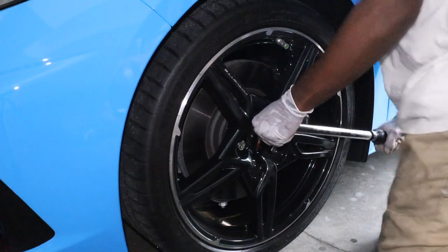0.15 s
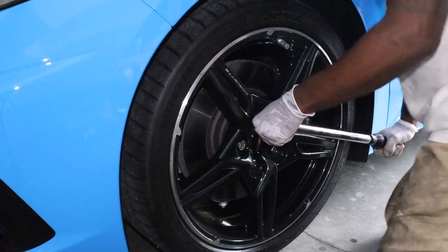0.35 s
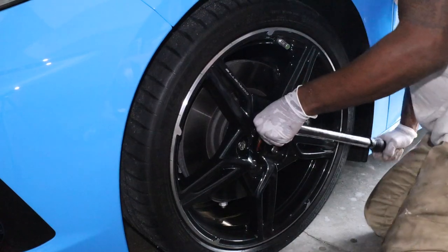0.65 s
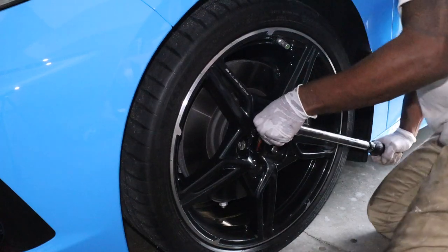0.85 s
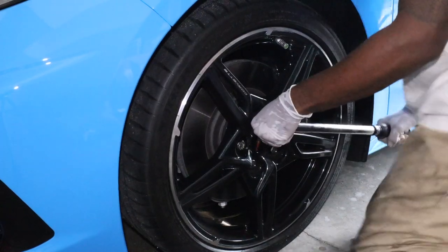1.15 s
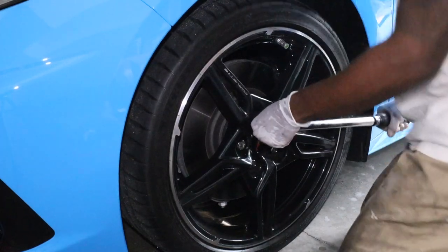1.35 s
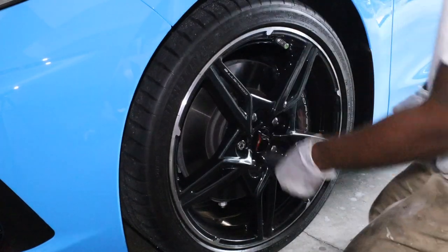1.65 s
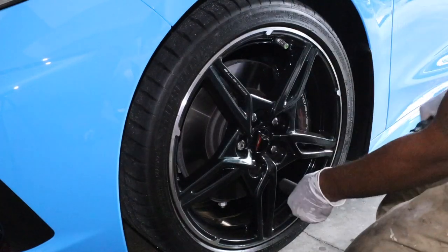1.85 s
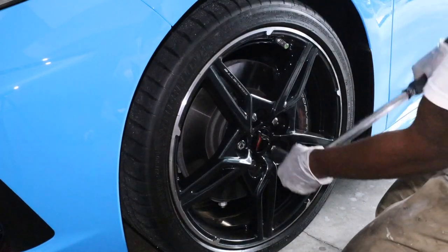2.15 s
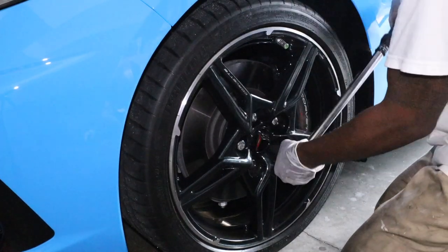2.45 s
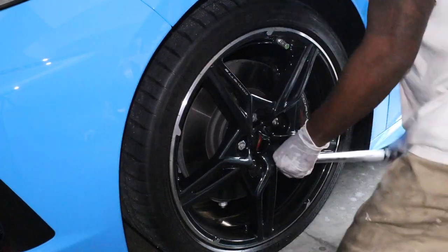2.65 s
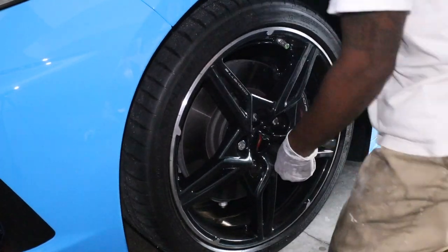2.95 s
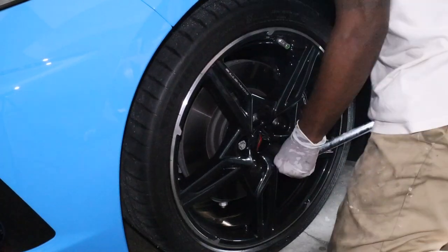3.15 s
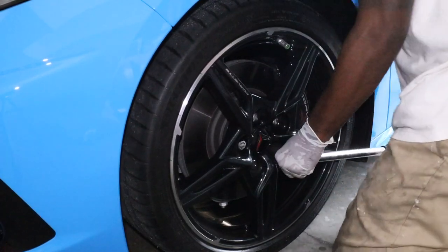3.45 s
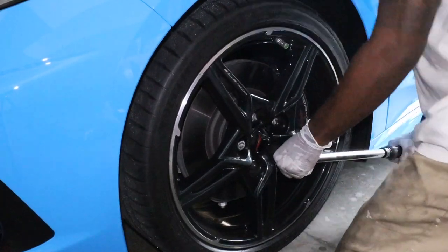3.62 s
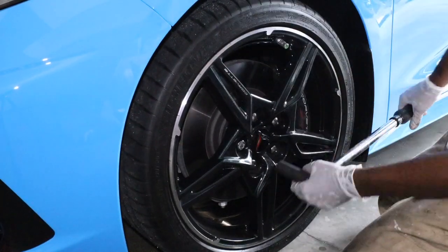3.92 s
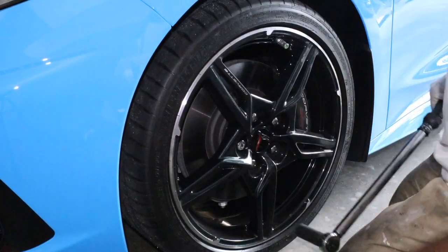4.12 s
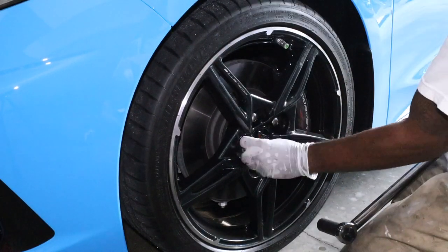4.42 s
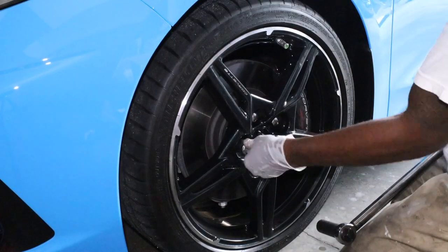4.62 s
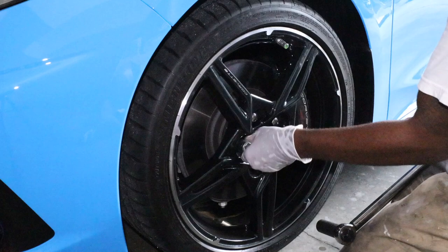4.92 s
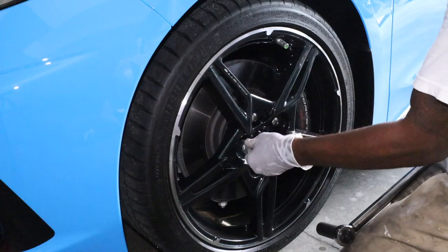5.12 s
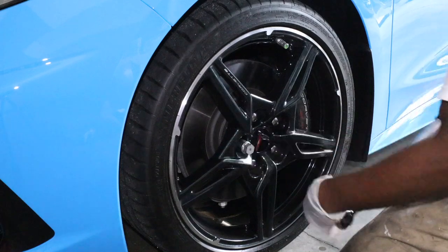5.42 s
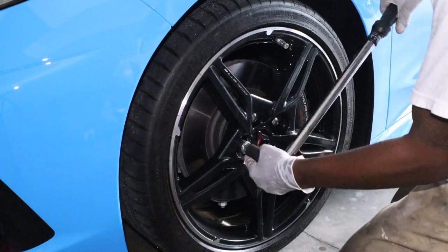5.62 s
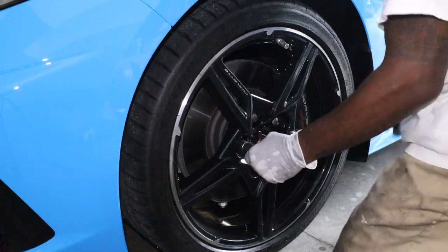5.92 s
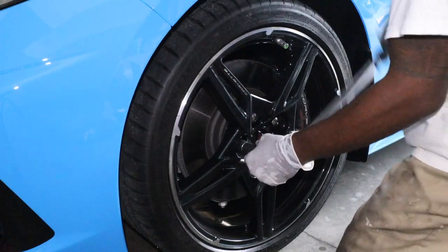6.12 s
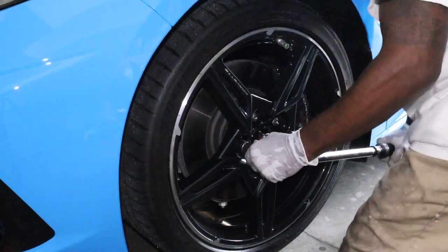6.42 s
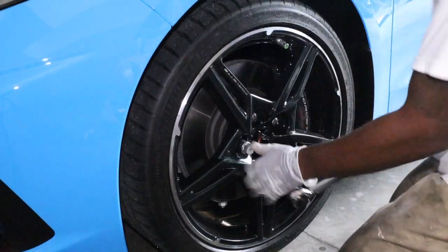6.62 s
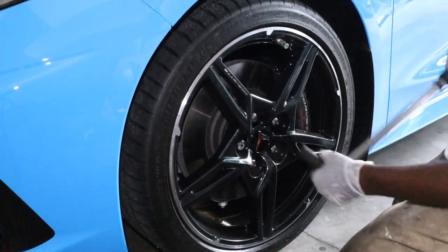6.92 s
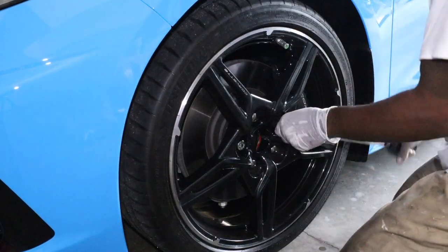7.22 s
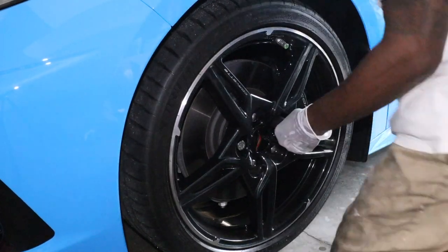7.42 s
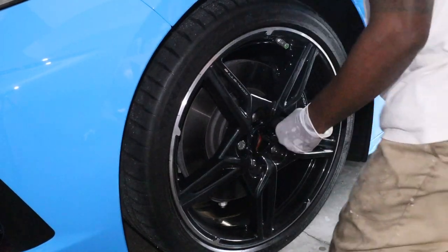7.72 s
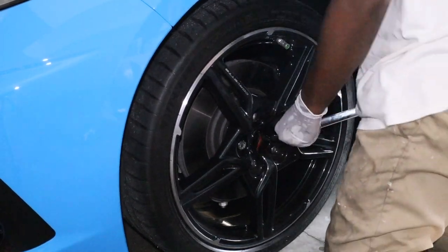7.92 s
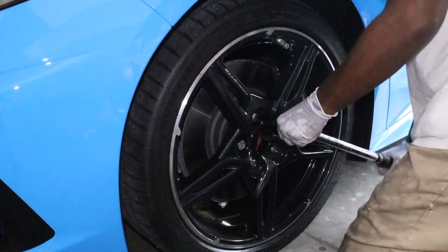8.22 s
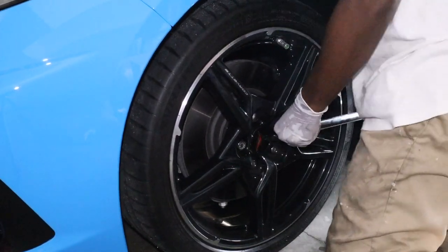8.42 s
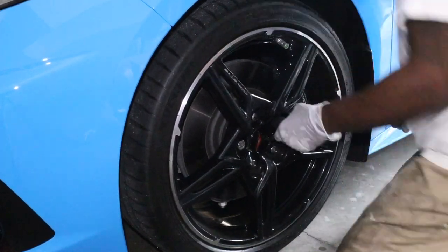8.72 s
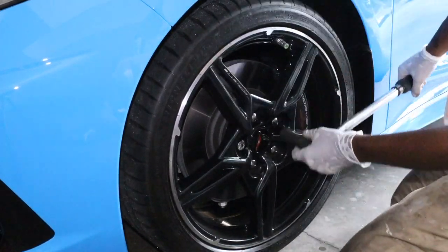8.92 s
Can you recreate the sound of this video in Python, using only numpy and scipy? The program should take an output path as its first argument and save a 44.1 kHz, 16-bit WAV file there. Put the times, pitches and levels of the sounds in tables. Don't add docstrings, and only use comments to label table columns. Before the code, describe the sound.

Close stereo in a hard-walled garage. A torque wrench snaps with a very loud, sharp steel clack, then a second, brighter one a third of a second later, each filling the room with metallic ringing. After a pause, much quieter sped-up handling: socket knocks, nuts chinking, ratchet ticks in smeared bursts, with three quick double clacks, over a dull distant hum.

```python
import sys
import numpy as np
from scipy import signal
from scipy.fft import rfft, irfft
from scipy.io import wavfile
from scipy.ndimage import uniform_filter1d

SR = 44100
rng = np.random.default_rng(int(sys.argv[2]) if len(sys.argv) > 2 else 0)


def wrap_up_sound(samples):
    columns = np.atleast_2d(samples).T
    tamed = np.clip(columns, -1, 1)
    steps = np.round(tamed * 32767).astype(np.int16)
    wavfile.write(sys.argv[1], SR, steps)


def natural_amplitude(level_db):
    exponent = np.asarray(level_db, float) / 20
    return 10 ** exponent


N = 399546
TIME = np.arange(N) / SR


def rms_one(x):
    return x / np.sqrt(np.mean(x ** 2) + 1e-20)


def at_hz(points, hz):
    table_hz, value = np.transpose(points)
    return np.interp(np.log(hz), np.log(table_hz), value)


def drift(rate_hz):
    r = np.exp(-80 * np.pi * rate_hz / SR)
    white = rng.standard_normal(N // 40 + 2002)
    slow = signal.lfilter([1], [1, -2 * r, r * r], white)[2000:]
    return np.interp(np.arange(N) / 40, np.arange(len(slow)), rms_one(slow))


# pitch_hz, likeness (1 = same)
PORT_LIKENESS = [(60, 1), (170, 1), (510, 1), (1470, 0.19), (4260, -0.2), (12400, 0.85)]


def stereo_noise(spectrum, direct):
    hz = np.maximum(np.fft.rfftfreq(N, 1 / SR), 10)
    alike = np.clip(direct + (1 - direct) * at_hz(PORT_LIKENESS, hz), 0, .975)
    mid, side = rfft(rng.standard_normal((2, N))) * natural_amplitude(at_hz(spectrum, hz))
    both = np.sqrt(1 + alike) * mid + np.sqrt(1 - alike) * side * [[1], [-1]]
    return rms_one(irfft(both, N))


def resonance(x, hz, width_hz):
    r = np.exp(-np.pi * np.clip(width_hz, 60, 2000) / SR)
    feedback = [1, -2 * r * np.cos(2 * np.pi * hz / SR), r * r]
    return signal.lfilter([(1 - r * r) / 2, 0, (r * r - 1) / 2], feedback, x)


def body(envelopes, modes, bands, direct, bed_db, touch_db, grain_db):
    grit = stereo_noise([(20, 0), (20000, 0)], direct) * natural_amplitude(grain_db * drift(300))
    out = 0
    for envelope, (low, high) in zip(envelopes, bands):
        mine = [mode for mode in modes if low <= mode[0] < high]
        sos = signal.butter(4, [low, high], "band", fs=SR, output="sos")
        force = signal.sosfilt(sos, grit * envelope + 1e-18)
        top_db = max(db for hz, width, db in mine)
        bed_power = natural_amplitude(2 * bed_db) * (high - low)
        mode_power = sum(np.pi / 2 * width * natural_amplitude(2 * (db - top_db)) for hz, width, db in mine)
        band = natural_amplitude(bed_db) * force
        for k, (hz, width, db) in enumerate(mine):
            push = force * natural_amplitude(db - top_db + touch_db * drift(31))
            band += (-1) ** k * resonance(push, hz, width)
        out = out + band * np.sqrt(SR / 2 / (bed_power + mode_power))
    return out


def rise_and_fall(smear_ms):
    return 0.96 * smear_ms, 4 + 0.92 * smear_ms


def swell(s, rise_ms, fall_ms):
    near = slice(max(round((s - .1) * SR), 0), round((s + .3) * SR))
    ms = (TIME[near] - s) * 1000
    ramp = np.clip(1 + ms / (1.81 * max(rise_ms, .2)), 0, 1)
    return near, ramp * natural_amplitude(-10 * np.maximum(ms, 0) / max(fall_ms, .8))


def wavering(hz, time, phases):
    spread = np.clip(hz / 6000, 0, 1) * phases[1] * np.array([[-1], [1]])
    return np.sqrt(2) * np.sin(2 * np.pi * (hz * time + phases[0]) + spread)


# time_s, level_db
AIR_LEVEL = [(0, -45), (.3, -52), (.42, -50.5), (.55, -50), (1.4, -44), (1.7, -53), (1.95, -48.5),
             (2.15, -54.5), (2.6, -59.5), (6.65, -57.5), (7.2, -55.5), (7.5, -57.5), (9.06, -59.5)]
# pitch_hz, level_db (per Hz)
HUM_COLOUR = [(15, -47), (25, -15.5), (113, -1), (169, -5.5), (283, -5), (321, -11.5), (374, -9.5),
              (700, -27), (910, -57), (1540, -120)]
# pitch_hz, level_db (per Hz)
HISS_COLOUR = [(290, -15.5), (500, -0.5), (580, -2), (1060, 0), (1760, -3), (2300, -3.5), (2890, -7),
               (8290, -21), (11500, -29), (12600, -49.5), (16400, -69), (22000, -120)]
HUM_DB, DUCK_HUM_DB, DUCK_HISS_DB, DUCK_S = -2, -4, -8.5, 0.57
NEAR_TREBLE_DB, FAST_FROM_S = -3, 1.8


def air():
    level_db = np.interp(TIME, *np.transpose(AIR_LEVEL))
    ducked = 0
    for clack in CLACKS:
        age = TIME - clack[0]
        ducked = ducked + (age > 0) * np.clip(2 - age / DUCK_S * 2, 0, 1)
    hum_db = level_db + HUM_DB + DUCK_HUM_DB * ducked + 2.2 * drift(16)
    hum = stereo_noise(HUM_COLOUR, direct=.01) * natural_amplitude(hum_db)
    hiss_db = level_db + DUCK_HISS_DB * ducked + 1.8 * drift(32)
    hiss = stereo_noise(HISS_COLOUR, direct=0.02) * natural_amplitude(hiss_db)
    treble = signal.sosfilt(signal.butter(2, 4000, "high", fs=SR, output="sos"), hiss)
    hiss = hiss + natural_amplitude(NEAR_TREBLE_DB) * treble * (TIME < FAST_FROM_S)
    return (hum + hiss) * natural_amplitude([[-.6], [.6]])


# start_s, peak_db, pitch_hz
BUMPS = [(0.047, -40, 213), (2.347, -45, 137), (2.927, -47, 243), (6.429, -51, 153), (6.485, -39.5, 169),
         (3.59, -46, 290), (3.65, -45, 300), (6.52, -47, 200), (7.176, -44.5, 255), (7.213, -47, 194),
         (8.401, -43, 208), (8.658, -43, 297)]


def bumps():
    out = np.zeros(N)
    for s, peak_db, hz in BUMPS:
        age = np.maximum(TIME - s, 0)
        shape = age / 0.0046 * np.exp(1 - age / 0.0052)
        out += natural_amplitude(peak_db) * shape * np.sin(2 * np.pi * hz * age)
    return out


# start_s, level_db, brightness_db, smear_ms
THUDS = [(.049, -56, 1, 15), (.21, -54.5, -3.5, 89), (1.296, -47.5, -11, 31), (1.45, -45.5, -24, 9.2),
         (1.47, -45, -33, 12), (1.488, -61, -3, 12), (1.511, -46, -16, 43), (2.149, -39.5, -8, 10),
         (2.154, -32, -5.5, 8.3), (2.178, -56, -2, 11), (2.2265, -26, -3.5, 0.88), (2.391, -54, -4, 10),
         (4.123, -50.5, -31, 19), (7.084, -45, -27, 7.3), (8.939, -53, -15, 21), (9.06, -35.5, -22, 9.2)]
# start_s, level_db, brightness_db, smear_ms
KNOCKS = [(2.244, -31.5, -9.5, 19.6), (2.35, -44, -28, 17), (3.912, -52.5, -28, 39), (4.278, -30, -28, 7),
          (4.312, -41.5, -28, 8.8), (4.397, -27.5, -10.5, 6.3), (4.407, -47, -12, 17),
          (4.952, -45, -28, 15), (5.054, -45, -25, 3), (5.072, -45, -25, 12), (5.15, -52, -22, 8),
          (5.23, -43.5, -26, 7.1), (5.264, -34.5, -16, 19.7), (5.59, -35, -8.5, 13.2), (5.6, -39, -21, 13),
          (6.162, -52.5, -1, 24), (6.749, -45, -14, 6), (6.765, -50, -14, 10), (6.868, -27, -27, 1.3),
          (6.878, -34, -22, 7), (6.914, -36.5, -22, 24), (6.945, -43, -14, 14), (6.97, -46, -17, 7.9),
          (7.037, -26.5, -8.5, 2.3), (7.048, -36, -13, 12), (7.181, -40.5, -24, 9.8),
          (7.22, -39, -20.5, 14.8), (8.953, -35, -22.5, 3.6)]
# start_s, level_db, brightness_db, smear_ms
CHINKS = [(1.326, -41, -12, 3), (2.262, -32, -17, 10.8), (2.58, -60, -2, 2.7), (2.75, -54.5, -17, 2.7),
          (3.755, -50.5, -17, 15), (3.918, -26.5, -9, 2.5), (3.924, -35.5, -8, 8), (4.311, -34.5, -26, 13),
          (4.335, -50, -18, 33), (4.424, -37, -19, 26), (4.462, -31.5, -13, 12), (4.597, -49.5, -28, 10),
          (4.703, -45, -32, 14), (4.72, -43.5, -21, 15), (4.768, -39, -26, 13.4), (4.789, -34, -19, 14),
          (4.829, -31, -17.5, 16.7), (5.242, -30.5, -24, 10), (5.28, -40, -20, 8), (5.328, -34.5, -12, 3.9),
          (5.334, -42, -16, 7.8), (5.348, -44, -17, 18), (5.355, -29.5, -8.5, 2.6), (5.672, -30.5, -18, 2),
          (5.682, -31.5, -18, 15.6), (5.739, -34.5, -9, 14.2), (6.787, -41, -13.5, 9),
          (7.73, -42, -17, 4.1), (7.865, -48.5, -25, 4.8), (8.415, -53, -6, 15), (9.051, -33, -11, 6.5)]
# start_s, level_db, brightness_db, smear_ms
TICKS = [(.552, -53, -8, 70), (2.418, -51, -9, 4.9), (2.433, -50.5, 0, 22), (2.465, -51, 3, 2.4),
         (2.482, -50.5, -3, 27), (2.494, -41, -1, 1.1), (2.794, -33.5, -14, 1.1), (2.813, -46.5, -17, 23),
         (2.823, -42, -2.5, 27), (4.53, -46.5, -8.5, 18), (5.373, -47, -13, 10), (5.809, -43.5, -1, 1.1),
         (5.861, -37, -7, 1.3), (6.108, -35, -2.5, 2), (6.117, -38, -4, 9), (6.139, -40, -6, 19),
         (6.877, -28, -22, 1.4), (7.425, -49, -3, 24.6), (7.438, -47, -8, 11), (7.451, -50, 0, 4.3),
         (7.759, -45.5, -3, 8.9), (7.789, -48.5, -2, 12.4), (8.337, -45, -3.5, 2.8), (8.36, -47, -6, 19),
         (8.37, -39.5, -5, 2.1)]
LOW_SHARE_DB = {"wrench": -12, "thud": 3.5, "knock": -2.5, "chink": -8.5, "tick": -10.5}


def burst_envelopes(kinds, blur_ms):
    power = np.zeros((3, N))
    for kind, rows in kinds.items():
        for s, level_db, bright_db, smear_ms in rows:
            rise_ms, fall_ms = rise_and_fall(smear_ms)
            near, shape = swell(s, rise_ms - blur_ms, fall_ms - blur_ms / 2)
            shares_db = np.array([[LOW_SHARE_DB[kind]], [0], [bright_db]])
            power[:, near] += (natural_amplitude(level_db + shares_db) * shape) ** 2
    return np.sqrt(power)


# start_s, tail_db, crack_lag_s, crack_db, brightness_db
FAST_CLACKS = [
    (3.5628, -37, 0.02, -25, 1),
    (3.630, -37.5, 0.016, -27, 1),
    (6.4238, -34.5, 0.019, -27, -2),
    (6.4862, -38, 0.0007, -15.5, -2),
    (8.6147, -34, 0.00056, -28, 0),
    (8.6756, -37.5, 0.0195, -26, 1),
]
CRACK_FALL_MS, TAIL_SAG_DB_PER_S, TAIL_HOLD_S, TAIL_FALL_DB_PER_S = 1.7, 75, 0.039, 391


def fast_clacks(rows):
    power = np.zeros((3, N))
    for s, tail_db, lag, crack_db, bright_db in rows:
        age = TIME - s
        dying_db = TAIL_FALL_DB_PER_S * np.maximum(age - TAIL_HOLD_S, 0)
        tail = (age > 0) * natural_amplitude(tail_db - TAIL_SAG_DB_PER_S * abs(age) - dying_db)
        near, shape = swell(s + lag, 0.2, CRACK_FALL_MS)
        tail[near] += natural_amplitude(crack_db) * shape
        power += (natural_amplitude([[LOW_SHARE_DB["wrench"]], [0], [bright_db]]) * tail) ** 2
    return np.sqrt(power)


# pitch_hz, width_hz, level_db
SOCKET_MODES = [(680, 90, -7), (980, 200, 1), (1380, 260, 0), (1950, 240, -5), (2600, 300, 2.5),
                (3370, 200, -6), (4080, 300, -2), (5200, 500, -3), (7100, 600, -7), (11700, 150, -11)]
# from_hz, to_hz
SOCKET_BANDS = [(300, 1700), (1700, 4700), (4700, 12400)]


def handling():
    kinds = {"thud": THUDS, "knock": KNOCKS, "chink": CHINKS, "tick": TICKS}
    touches = burst_envelopes(kinds, blur_ms=2.7)
    both = body(touches, SOCKET_MODES, SOCKET_BANDS, direct=.5, bed_db=-5.5, touch_db=2.4, grain_db=3.2)
    for k, modes in enumerate(ROOM_COLOURS):
        blows = fast_clacks(FAST_CLACKS[k::2])
        both = both + body(blows, modes, WRENCH_BANDS, direct=.2, bed_db=-4, touch_db=2, grain_db=1.8)
    return both * natural_amplitude([[-1.1], [1.1]])


# start_s, peak_db, pitch_hz
SNAPS = [(.7212, -4, 3500), (1.0473, -4, 5700), (.732, -19, 4500), (.7365, -19, 5500), (6.138, -30, 1600),
         (2.226, -10, 1370), (2.243, -18, 1860), (3.581, -17.5, 4430), (3.646, -17, 4750),
         (3.917, -19, 1870), (4.279, -27, 4120), (4.396, -14.5, 1340), (4.783, -29, 3680),
         (4.828, -25, 4570), (5.238, -30, 4100), (5.354, -20, 1490), (5.589, -19.5, 1390),
         (5.673, -24, 4100), (5.809, -31, 2950), (5.86, -31, 4930), (6.106, -26, 1540), (6.443, -25, 4700),
         (6.486, -14.5, 5570), (6.867, -19.5, 2230), (6.877, -19, 1000), (6.904, -27, 3500),
         (6.948, -29, 2500), (6.913, -24, 1380), (7.037, -18, 900), (8.615, -23, 3200), (8.634, -27, 2700),
         (8.695, -24, 6300), (8.952, -24, 1500)]
SNAP_FALL_MS, SNAP_DB, SNAP_EDGE_DB = 0.66, -1.5, -6


def snaps():
    out, edge = np.zeros(N), np.zeros(N)
    for onset, peak_db, hz in SNAPS:
        s = onset + .0006
        near, shape = swell(s, .2, SNAP_FALL_MS)
        turn = 2 * np.pi * hz * (TIME[near] - s)
        ring = 0.84 * np.sin(turn) + 0.35 * np.sin(1.665 * turn)
        out[near] += natural_amplitude(peak_db + SNAP_DB) * shape * ring
        edge[round(s * SR)] = natural_amplitude(peak_db + SNAP_EDGE_DB) * 2
    edge_band = signal.butter(2, [600, 6500], "band", fs=SR, output="sos")
    edge = signal.sosfilt(edge_band, edge + 1e-18)
    return (out + edge) * natural_amplitude([[-1.1], [1.1]])


# start_s, pitch_hz, level_db, smear_ms
RINGS = [(0.051, 592, -42.5, 7.6), (1.467, 1842, -39, 7.2), (2.153, 1422, -51, 3.7), (2.2259, 1365, -28, 2),
         (3.6, 10630, -43, 25), (4.278, 4000, -26.5, 1.9), (4.281, 1000, -38, 7), (4.307, 4080, -29, 3.9),
         (4.315, 4060, -27.5, 5.1), (4.396, 1335, -39.5, 1.8), (4.789, 3780, -34.5, 4.1),
         (4.831, 4210, -34, 4.7), (5.243, 4048, -36, 9.1), (5.27, 2210, -40, 8.3), (8.632, 2630, -47, 3),
         (5.596, 950, -40, 16), (5.594, 4091, -36.5, 3.2), (5.735, 11700, -54, 14), (5.862, 4990, -46, 1.6),
         (6.46, 10680, -45, 16), (7.04, 620, -33, 4), (7.042, 1280, -35, 4), (7.056, 990, -41, 12),
         (8.63, 4760, -43, 14), (8.619, 11100, -41, 6), (8.953, 1450, -42, 7), (8.97, 11700, -60, 30),
         (4.72, 2350, -45, 6), (5.07, 2300, -47, 9), (8.617, 3900, -36, 1.5), (1.55, 11720, -50, 60),
         (4.125, 1655, -49, 11.6), (4.799, 2300, -41.5, 15), (6.79, 2520, -44.5, 5.5), (2.154, 702, -44, 4),
         (4.462, 4070, -38, 10), (4.424, 4050, -39, 5), (6.488, 2050, -35, 1), (6.435, 2350, -45, 10),
         (5.678, 4110, -39.5, 9.1), (8.628, 1040, -41, 4), (2.349, 5430, -47, 1.5),
         (2.387, 5500, -52.5, 1.6), (2.464, 5550, -39, 0.71), (2.493, 5240, -45, 1)]
# pitch_hz, level_db, fall_ms (per 10 dB)
STRUCK = [
    [(950, -30, 3), (1720, -25, 2), (2290, -24, 3), (2860, -21, 4), (3686, -13, 1.5), (4450, -20, 5),
     (5300, -14, 2), (7840, -21.5, 4), (11100, -16, 12)],
    [(1550, -23, 3), (2050, -21, 3), (3270, -24, 4), (4091, -22, 4), (4950, -22, 4), (5900, -13, 2),
     (9300, -22.5, 2.5), (10430, -16, 1)],
]
BOOM_HZ, BOOM_DELAY_S, BOOM_DB, BOOM_SMEAR_MS = 296.4, 0.126, -38, 10.5


def rings():
    out = np.zeros((2, N))
    booms = [(clack[0] + BOOM_DELAY_S, BOOM_HZ, BOOM_DB, BOOM_SMEAR_MS) for clack in CLACKS]
    tones = [(s, hz, db, *rise_and_fall(smear_ms)) for s, hz, db, smear_ms in booms + RINGS]
    for clack, modes in zip(CLACKS, STRUCK):
        tones += [(clack[0] + .0007, hz, db, .3, fall_ms) for hz, db, fall_ms in modes]
    for s, hz, level_db, rise_ms, fall_ms in tones:
        chance = rng.random(8)
        near, shape = swell(s, rise_ms, fall_ms)
        spread_hz = min(.07 * hz, 220)
        cluster = wavering(hz, TIME[near], chance[:2])
        cluster += .7 * wavering(hz - 25 - spread_hz * chance[6], TIME[near], chance[2:4])
        cluster += .7 * wavering(hz + 25 + spread_hz * chance[7], TIME[near], chance[4:6])
        out[:, near] += natural_amplitude(level_db + 0.5) * shape * cluster
    return out * natural_amplitude([[-1.1], [1.1]])


# start_s, peak_db, high_share_db, limiter_hold_s, held_room_db
CLACKS = [
    (0.7210, -6, -1.5, 0.18, -29),
    (1.0473, -6.5, 3, 0.15, -27.5),
]
# pitch_hz, width_hz, level_db
WRENCH_MODES = [(620, 60, -8), (985, 70, -2), (1500, 300, -7), (2250, 320, -2), (2750, 160, -4),
                (3450, 250, -5), (4350, 450, 0), (4800, 220, -2), (5750, 300, -3), (6400, 160, -6),
                (7400, 350, -6), (8050, 150, -5), (8860, 250, -6), (9850, 250, -6), (10900, 500, -2)]
# from_hz, to_hz
WRENCH_BANDS = [(300, 1700), (1700, 5500), (5500, 12400)]
# pitch_hz, width_hz, level_db
ROOM_COLOURS = [
    [(650, 68, -11), (965, 70, 0), (2420, 450, -5), (3100, 400, -4), (3600, 250, -5), (4400, 400, 0),
     (4720, 250, 0), (5400, 200, -5), (6300, 100, -11), (7660, 200, -6), (7920, 120, -5.5), (8500, 250, -8),
     (10300, 400, -7), (11000, 450, 1)],
    [(610, 60, -8), (954, 90, -2), (1690, 200, -3), (2100, 380, -.5), (3450, 450, 0), (4250, 350, 1),
     (5650, 490, -1), (6600, 110, -1), (6900, 520, -8), (9100, 350, -4), (9950, 300, -3), (10600, 120, -7),
     (11100, 220, -3)],
]
# pitch_hz, break_over_db, reset_db, extra_loss_db_per_s
HANDLE = [(10627, -8, -19, 8.5), (11178, -8, -21, 12), (10645, -10, -21, 10), (11140, -12, -22, 10),
          (10896, -18, -28, 10), (4730, -20, -30, 5.5), (2520, -24, -30.5, 10), (287.4, -20, -19, 6),
          (325.5, -24, -22, 10.5), (11560, -40, -22, 40.5), (11714, -39.5, -20.5, 41),
          (4445, -16.5, -29.5, 5), (3497, -29.5, -22, 9.5), (4145, -29, -20, 9.5), (4300, -22, -21, 9.5),
          (2100, -30, -22, 15)]
CLACK_LOW_DB, ROOM_DB_PER_S = -10, 131.5


def clacks():
    crack, wash, handle = np.zeros((3, N)), np.zeros((2, N)), np.zeros((2, N))
    for turn, ((s, peak_db, high_db, hold, room_db), modes) in enumerate(zip(CLACKS, ROOM_COLOURS)):
        age = TIME - s - .0004
        on = age > 0
        after = np.maximum(age, 0)
        shares = natural_amplitude([[CLACK_LOW_DB], [0], [high_db]])
        direct_and_echoes = natural_amplitude(-3300 * after) + natural_amplitude(-16.5 - 520 * after)
        crack += shares * on * natural_amplitude(peak_db - 5.5) * direct_and_echoes
        knee = .02 * np.logaddexp(0, (after - hold) / .02)
        held = on * natural_amplitude(room_db - 16 * after - ROOM_DB_PER_S * knee)
        room = natural_amplitude([[-10], [0], [-2.5]]) * held
        wash += body(room, modes, WRENCH_BANDS, direct=.1, bed_db=-13, touch_db=1.5, grain_db=.8)
        blow = 1 + 2.0 * natural_amplitude(-900 * after)
        for hz, *levels_db, loss_db in HANDLE:
            unsteady = natural_amplitude(2.6 * np.array([drift(14), drift(41)]))
            ring = natural_amplitude(levels_db[turn] - loss_db * after) * held * blow
            handle += ring * unsteady * wavering(hz, age, [.1, 1.3])
    snap = body(crack, WRENCH_MODES, WRENCH_BANDS, direct=.85, bed_db=-1, touch_db=1, grain_db=1)
    return snap * natural_amplitude([[-1.1], [1.1]]) + wash + handle


def scene():
    return clacks() + rings() + handling() + snaps() + bumps() + air()


def treble_gaps(x):
    hz, frames, cells = signal.stft(x, SR, nperseg=1024)
    chance = rng.standard_normal((65, len(frames)))
    chance = uniform_filter1d(chance, size=5, axis=1) * np.sqrt(5)
    bands = np.sum(abs(cells[:, :512]) ** 2, axis=0).reshape(64, 8, -1).sum(axis=1) + 1e-20
    band_db = 10 * np.log10(uniform_filter1d(bands, size=5, axis=1))
    chance[:64] -= .2 * (band_db - uniform_filter1d(band_db, size=5, axis=0))
    chance = np.repeat(chance, 8, axis=0)[:len(hz)]
    bar_hz = [1500, 3500, 6500, 10000, 10500, 11250, 11600]
    bar = np.interp(hz, bar_hz, [6, 2.1, 1.05, .2, 1.2, 1.2, -.6])
    power = np.sum(abs(cells) ** 2, axis=(0, 1)) + 1e-20
    attack = np.maximum(power, np.roll(power, -1)) > 8 * np.roll(power, 1)
    kept = np.where((chance > bar[:, None]) & ~attack, .006, 1)
    return signal.istft(cells * kept, SR, nperseg=1024)[1][:, :N]


def band_limit(x):
    return signal.sosfilt(signal.butter(12, 12960, fs=SR, output="sos"), x)


def record(dry):
    x = np.array([np.roll(dry[0], 1), dry[1]])
    top_cut = signal.cheby2(10, 60, 13410, fs=SR, output="sos")
    for stage in range(2):
        x = signal.sosfilt(top_cut, np.clip(x, -.72, .72))
    return band_limit(treble_gaps(x))


dry = scene()
out = record(dry)
wrap_up_sound(out)
```